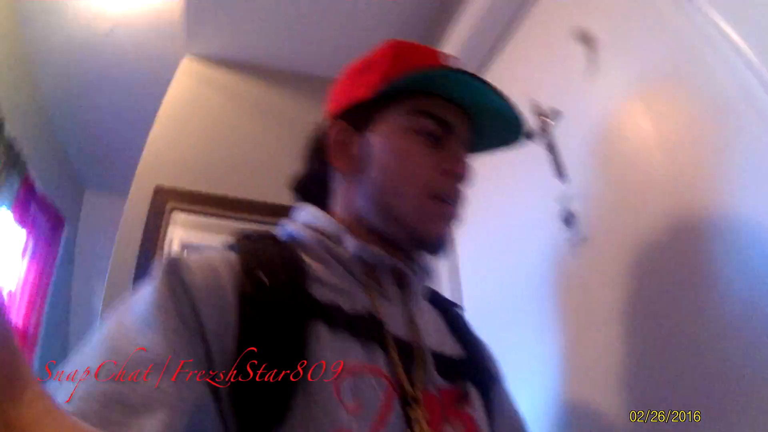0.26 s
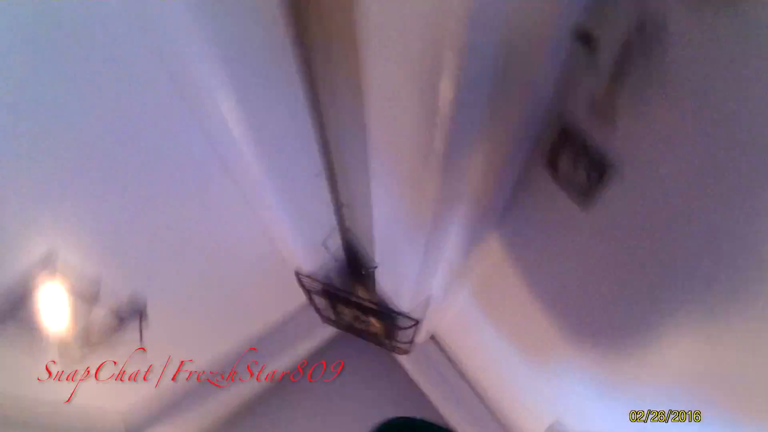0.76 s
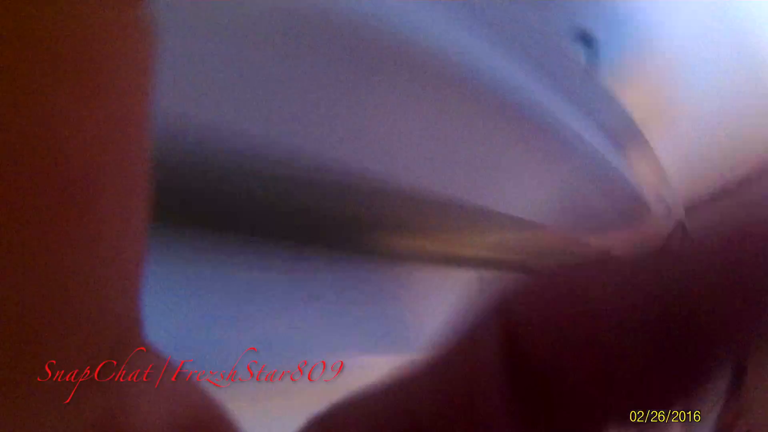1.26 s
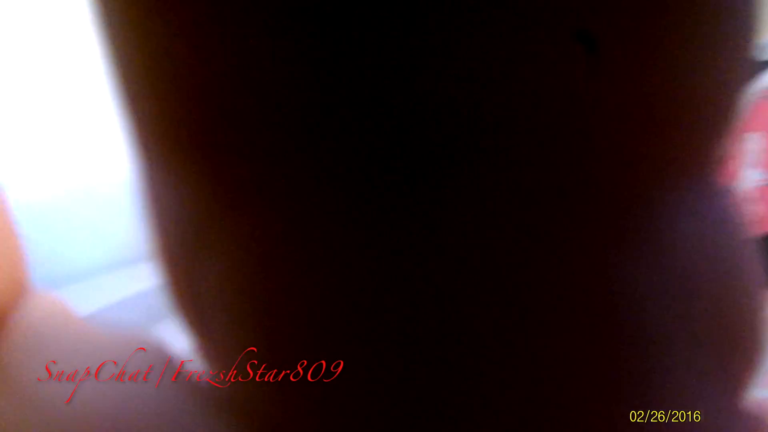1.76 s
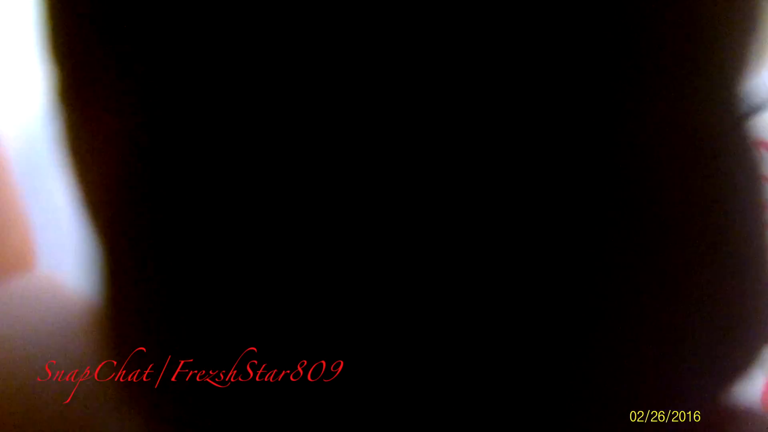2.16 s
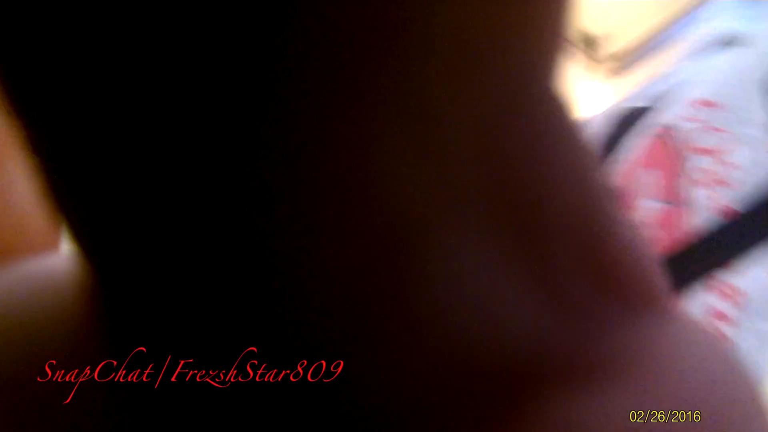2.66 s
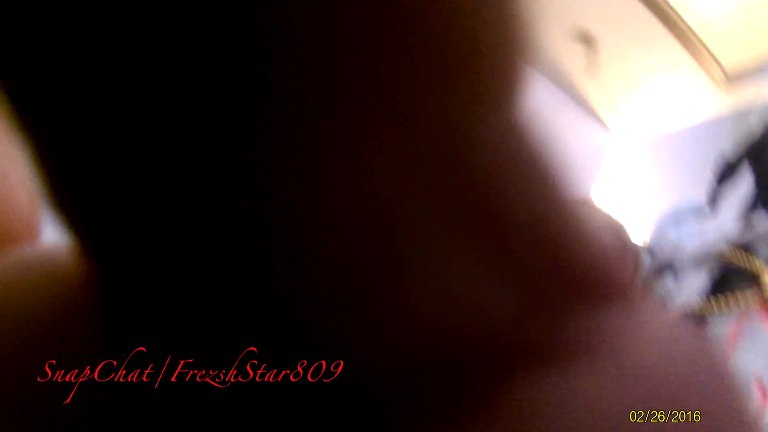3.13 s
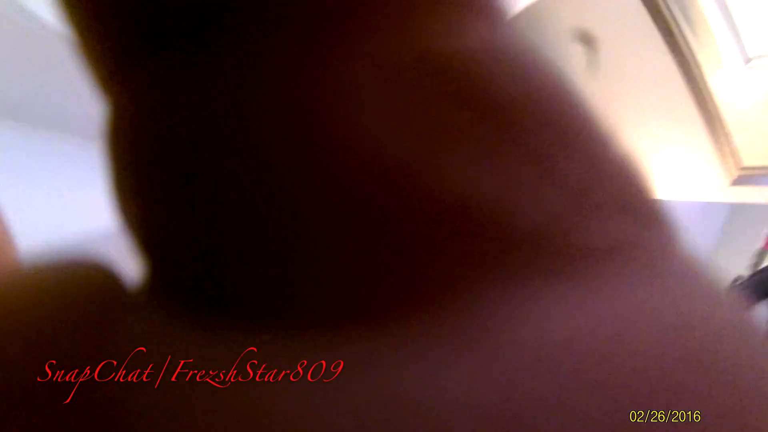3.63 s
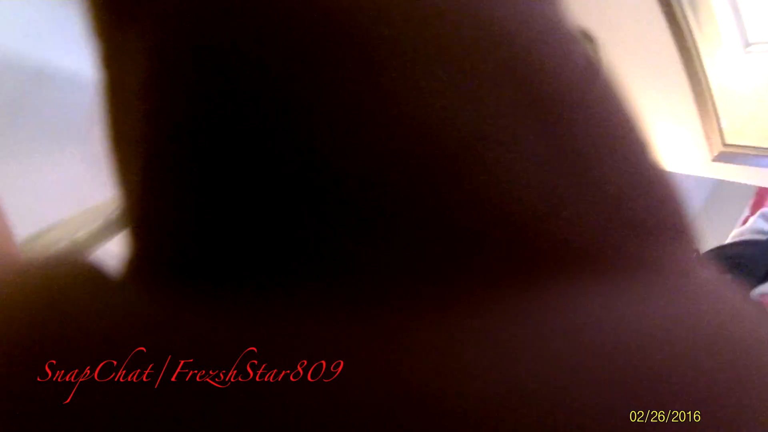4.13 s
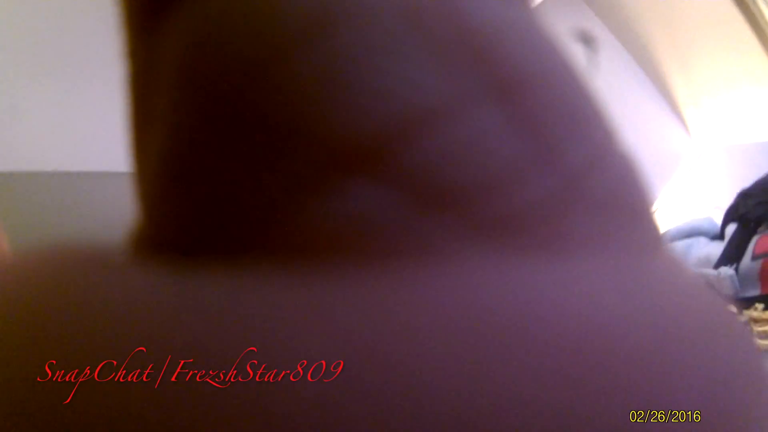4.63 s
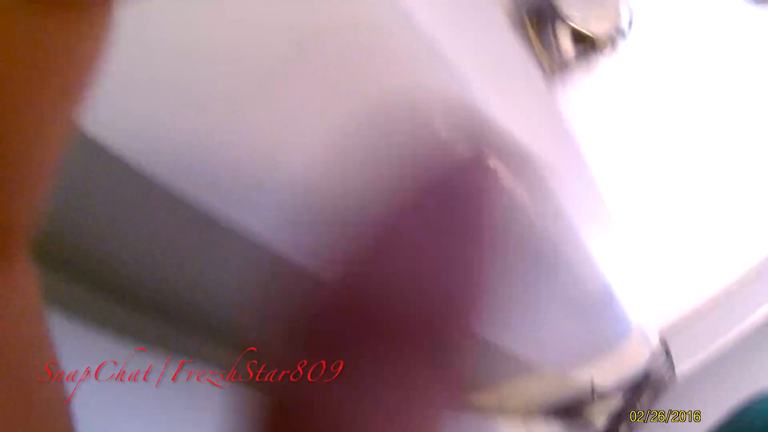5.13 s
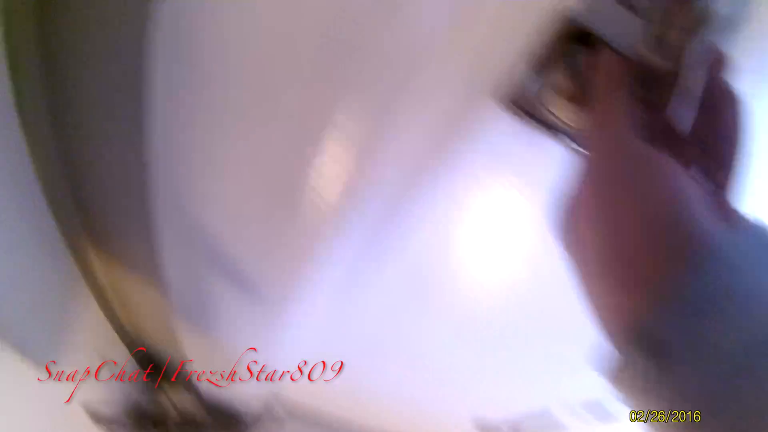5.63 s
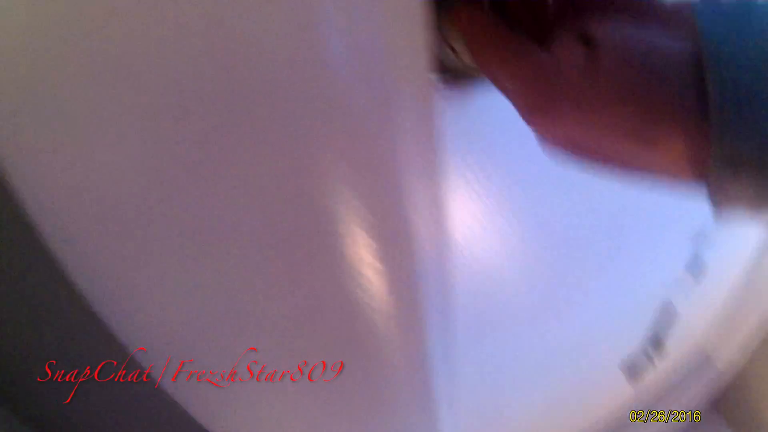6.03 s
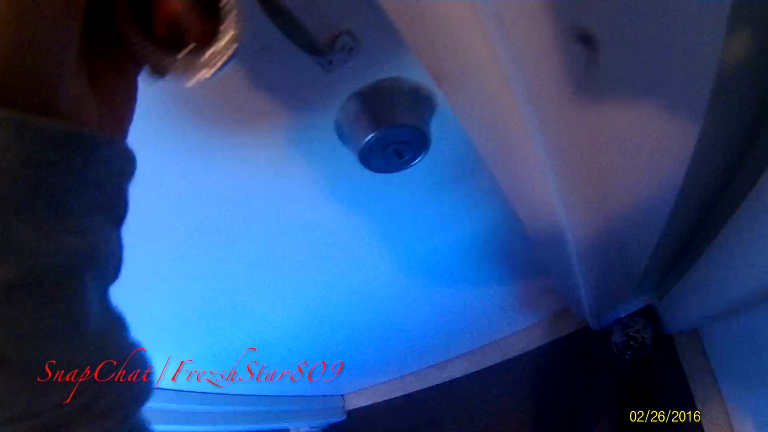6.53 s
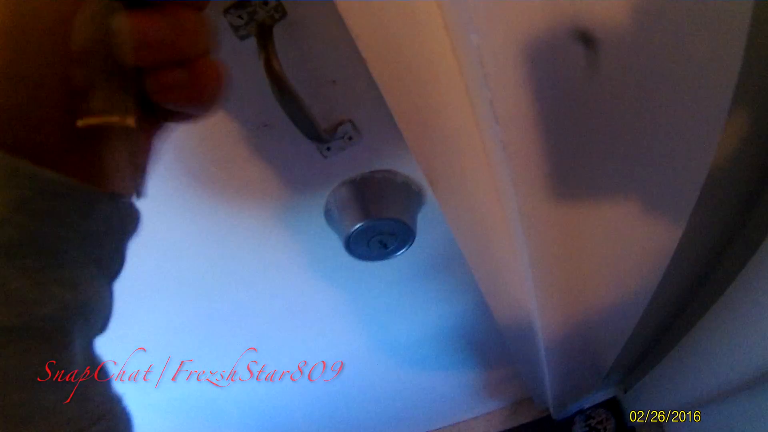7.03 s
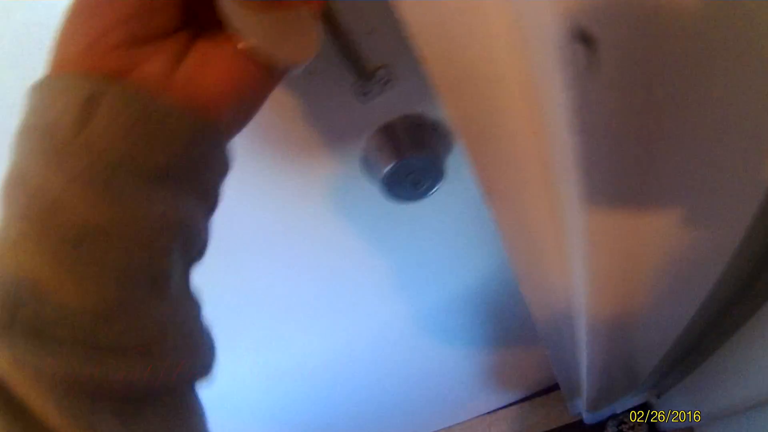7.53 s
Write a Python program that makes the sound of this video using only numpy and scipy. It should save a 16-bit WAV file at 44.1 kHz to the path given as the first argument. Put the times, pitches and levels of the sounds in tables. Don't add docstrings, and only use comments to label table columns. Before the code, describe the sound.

A handheld camera is bumped and scraped while keys jingle; a bolt clanks loudly, a door slams, and a dry snap cuts to silence.

```python
import sys
import numpy as np
from scipy import signal
from scipy.fft import rfft, irfft
from scipy.io import wavfile

SR = 44100
rng = np.random.default_rng(int(sys.argv[2]) if len(sys.argv) > 2 else 0)


def generate_wav(signal):
    frames = np.transpose(np.atleast_2d(signal))
    scaled = np.clip(frames, -1, 1) * 32767
    pcm = np.round(scaled).astype(np.int16)
    wavfile.write(sys.argv[1], SR, pcm)


def voltage_ratio(level):
    return 10 ** (np.asarray(level, float) / 20)


N = 343098
T = np.arange(N) / SR

# t/s, effort/dB, share of keys [0-1], share of dull wood [0-1], palm muffling/dB
MOTION = [(0, -56.5, 0.33, 0, 5), (1.07, -43.5, 0.18, 0.16, 5.5), (1.5, -45, 0, 0.15, 11),
          (1.93, -56, 0.2, 0.2, 7), (2.33, -52, 0.88, 0.01, 7), (2.8, -50, 0.46, 0, 2),
          (3.33, -54.5, 0.66, 0, -1.5), (3.9, -59.5, 1, 0.87, -6), (4.4, -52.5, 0.03, 0.4, 17),
          (4.55, -30.5, 0, 0.98, 18), (4.9, -38, 0, 0.87, 5), (5.15, -39.5, 0.7, 0.4, -2.5),
          (5.5, -40, 0.56, 0.5, 0), (5.68, -47, 1, 0.7, 1.5), (5.95, -35.5, 0.07, 0.14, 17.5),
          (6.34, -38.5, 0, 0.63, 5.5), (6.42, -54.5, 0.8, 0.8, -8), (6.9, -67.5, 0.1, .4, 0.5)]
# f/Hz, level/dB
BUNCH = [(2450, -5), (6200, -5), (7000, -12.5), (10880, 1.5), (11550, -3), (12610, -13), (14200, -3.5),
         (15550, -4.5)]
# f/Hz, width/Hz, level/dB
SHELL = [(883, 583, -3), (1105, 130, 4), (1353, 172, 0), (1784, 475, -3), (2287, 280, -6.5)]
# f/Hz, width/Hz, level/dB
CASE = [(3440, 2500, -2), (3920, 1640, 7.5), (6170, 1900, 1)]
# t/s, level/dB, length/s
SLAM = [
    (6.924, -31, .02),
    (6.936, -18, .013),
    (6.946, 0, .02),
    (6.97, -7, .034),
    (7.005, -27, .045),
]


def rms_one(x):
    return x / np.sqrt(np.mean(x ** 2) + 1e-20)


def in_time(rows):
    s, *columns = np.transpose(rows)
    return [np.interp(T, s, c) for c in columns]


def band(x, low_hz, high_hz):
    sos = signal.butter(2, [low_hz, min(high_hz, .45 * SR)], "band", fs=SR, output="sos")
    return signal.sosfilt(sos, x)


def drift(rate):
    r = np.exp(-80 * np.pi * rate / SR)
    noise = rng.standard_normal(N // 40 + 2002)
    slow = signal.lfilter([1], [1, -2 * r, r * r], noise)[2000:]
    return np.interp(np.arange(N) / 40, np.arange(len(slow)), rms_one(slow))


def body(x, modes):
    out = 0
    for k, (hz, width_hz, db) in enumerate(modes):
        r = np.exp(-np.pi * max(width_hz, 2) / SR)
        gain = (-1) ** k * voltage_ratio(db) * (1 - r * r) / 2
        out = out + signal.lfilter([gain, 0, -gain], [1, -2 * r * np.cos(2 * np.pi * hz / SR), r * r], x)
    return out


def clumped(x, modes, grain):
    return sum((-1) ** k * np.roll(grain, k * N // 7) ** 1.1 * body(x, [mode])
               for k, mode in enumerate(modes))


def place(times, sounds, peaks_db):
    out = np.zeros(N + sounds.shape[1])
    for s, sound, db in zip(times, sounds, peaks_db):
        at = round(s * SR)
        out[at:at + len(sound)] += voltage_ratio(db) * sound / np.max(np.abs(sound))
    return out[:N]


def dying(t60, rise_s, size):
    t = np.arange(size) / SR
    return (1 - np.exp(-t / rise_s)) * voltage_ratio(-60 * t / np.clip(t60, .004, 1)[:, None])


def noise_bursts(t60, rise_s, size):
    return rng.standard_normal((len(t60), size)) * dying(t60, rise_s, size)


def rung(times, db, hz, t60, rise_s):
    t = np.arange(12000) / SR
    return place(times, dying(t60, rise_s, size=len(t)) * np.sin(2 * np.pi * np.outer(hz, t)), db)


def among_keys(bursts, chance, width_hz):
    count = len(BUNCH)
    rows = []
    for row, c in zip(bursts, chance):
        modes = [(min(hz * (1 + .05 * c[k]), 15800), width_hz, db + 4.5 * c[count + k])
                 for k, (hz, db) in enumerate(BUNCH)]
        rows.append(body(row, modes))
    return np.array(rows)


def pitched(rows, t60_s, broad):
    s, db, hz = np.transpose(rows)
    noise = noise_bursts(t60_s + 0 * s, 0.00022, size=1500)
    sounds = [body(row, [(f, f / 11, 0)]) + broad * band(row, f / 2, f * 2) for row, f in zip(noise, hz)]
    return place(s, np.array(sounds), db)


def hiss():
    # f/Hz, level/dB
    colour = [(12, -17.5), (20, 10), (74, 5.5), (542, -6), (1660, -18.5), (5530, -36.5), (7520, -34),
              (10200, -26), (16000, -29)]
    hz = np.maximum(np.fft.rfftfreq(N, 1 / SR), 1)
    colour_hz, colour_db = np.transpose(colour)
    gain = voltage_ratio(np.interp(np.log(hz), np.log(colour_hz), colour_db))
    return voltage_ratio(-49) * rms_one(irfft(rfft(rng.standard_normal(N)) * gain, N))


def handling_rumble():
    lumps = band(signal.lfilter([1], [1, -.985], rng.standard_normal(N)), 25, 510)
    return voltage_ratio(-26 + .53 * in_time(MOTION)[0] + 2.0 * drift(2.8)) * rms_one(lumps)


def circuit_whistle():
    # t/s, level/dB, chopping depth [0-1]
    tone = [
        (0, -61, .3),
        (1.3, -58, .3),
        (4.2, -57, .45),
        (6.4, -57, .95),
        (7.6, -57, .95),
    ]
    whistle_hz, chop_hz, chop_start_s = 10020, 38.3, 6.556
    db, depth = in_time(tone)
    off = (T - chop_start_s) * chop_hz % 1 > .52
    whistle = voltage_ratio(db) * (1 - np.clip(depth, 0, 1) * off) * np.sin(2 * np.pi * whistle_hz * T)
    wobble = voltage_ratio(-55) * (T < .21) * rms_one(band(rng.standard_normal(N), 9200, 9900))
    return whistle + wobble


def groans():
    # t/s, length/s, level/dB, f/Hz
    low_groans = [(0, 0.074, -49.5, 570), (.575, 0.048, -34, 190), (.575, .08, -38.5, 91),
                  (.65, .06, -42, 170), (.7, 0.095, -39.5, 60), (2.38, 0.1, -48.5, 1486),
                  (2.44, 0.061, -47, 1830), (2.76, 0.12, -45, 224), (3.055, 0.035, -43, 1050),
                  (3.15, 0.11, -50, 250), (4.15, 0.27, -49, 179), (4.45, 0.27, -37, 165),
                  (4.52, 0.11, -37, 65.4), (5.06, 0.057, -44, 170), (7.009, .2, -39, 200),
                  (7.32, 0.073, -39, 224)]
    out = np.zeros(N)
    for s, length, db, hz in low_groans:
        noise = rng.standard_normal(round(length * SR) + 4000)
        mode = [(hz, min(hz / 4.5, 40), 0)]
        groan = rms_one(body(body(noise, mode), mode)[4000:])
        at = round(max(s, 0) * SR)
        out[at:at + len(groan)] += voltage_ratio(db) * groan * np.hanning(len(groan)) ** .5
    return out


def stroke_power():
    # t/s, length/s, level/dB
    skin_rubs = [(.396, .13, -42), (.554, 0.075, -32.5), (.718, 0.022, -42), (.756, 0.039, -36),
                 (.866, 0.11, -35), (.99, 0.07, -37.5), (1.134, .13, -33), (1.62, 0.13, -36.5),
                 (3.054, 0.046, -40.5), (5.298, 0.012, -25.5), (5.855, 0.014, -13.5), (6.124, 0.11, -34.5),
                 (6.253, 0.11, -41.5)]
    door_scrapes = [(2.07, 0.07, -46), (4.459, 0.15, -31.5), (4.55, 0.092, -29.5), (5.79, 0.048, -22.5),
                    (6.1, 0.012, -12), (6.645, 0.02, -38.5), (6.729, 0.02, -44.5), (6.772, 0.021, -40.5),
                    (7.146, 0.035, -27.5), (7.18, 0.05, -34), (7.438, 0.014, -30.5), (7.455, 0.02, -32.5)]
    grips = [(.95, 0.08, -30), (3.793, 0.017, -33), (4.113, 0.07, -41.5), (4.186, 0.096, -32),
             (4.28, 0.069, -37.5), (4.754, 0.16, -32), (5.77, 0.021, -24)]
    key_shakes = [(1.768, .05, -37), (3.41, 0.11, -37.5), (3.64, 0.093, -30), (5.791, .021, -19.5),
                  (7.135, 0.11, -39.5)]
    # strokes, shell/dB, rub/dB, bright/dB, place of the top [0-1]
    kinds = [(skin_rubs, -1.8, 2.4, -3, 0.64), (door_scrapes, .1, -3.5, -28.5, 0.54),
             (grips, .1, -34, -26, 0.18), (key_shakes, -18.5, -3.5, .1, 0.14)]
    # t/s, shell/dB, rub/dB, bright/dB, t60/s
    shudder = (7, -22.5, -33, -50, 1)
    s, *db, t60 = shudder
    decay = voltage_ratio(np.array(db)[:, None] - 60 * (T - s) / t60)
    power = (decay * np.clip((T - s) / .04 + 1, 0, 1)) ** 2
    for rows, *colour_db, top in kinds:
        for s, length, db in rows:
            end = s + 1.5 * length
            span = slice(round(s * SR), round(end * SR))
            corners = [s, s + length * np.clip(top, .05, .95), s + length, end]
            swell = np.interp(T[span], corners, [0.24, 1, .2, 0.024])
            power[:, span] += (voltage_ratio(db + np.array(colour_db))[:, None] * swell) ** 2
    return power


def motion():
    # f/Hz, width/Hz, level/dB
    leaf = [(1870, 160, -1.5), (2450, 96, 1), (2790, 120, -4.5), (3600, 75, -3), (5360, 51, -9.5)]
    effort_db, metal, wood, muffle_db = in_time(MOTION)
    metal, wood = np.clip([metal, wood], 0, 1)
    rub_db = effort_db - 0.3 - 0.52 * muffle_db
    bright_db = effort_db + 3.5 * metal - 9 * wood - muffle_db
    shell, rub, bright = np.sqrt(voltage_ratio(np.array([effort_db, rub_db, bright_db])) ** 2 + stroke_power())

    white = rng.standard_normal((3, N))
    calm = np.where(T > SLAM[0][0], 1, wood)
    grain = voltage_ratio((1 - .55 * calm) * 3.37 * drift(30) + 0.8 * drift(200))
    born = rng.random(N) < 800 * voltage_ratio(5.0 * drift(25)) / SR
    clicks = born * voltage_ratio(2.5 * np.minimum(rng.exponential(1, N), 3)) + 1e-18
    held_width_hz = 170
    jangle = sum(body(clicks * rng.standard_normal(N), [(hz, held_width_hz, db)]) for hz, db in BUNCH)
    jangle = rms_one(jangle) + .5 * rms_one(clicks * white[0])

    def with_keys(noise, low_hz, high_hz):
        friction = rms_one(grain * band(noise, low_hz, high_hz))
        return np.sqrt(1 - metal) * friction + np.sqrt(metal) * rms_one(band(jangle, low_hz, high_hz))

    through_shell = clumped(white[0], SHELL, grain) + 0.014 * band(white[0], 340, 3000)
    rumble = shell * rms_one(voltage_ratio(2.2 * drift(54)) * through_shell)
    scrape = band(clumped(white[1], leaf, grain), 1500, 5500) + 0.18 * band(white[1], 1800, 3500)
    skin = np.sqrt(1 - wood) * rms_one(body(white[1], CASE)) + np.sqrt(wood) * rms_one(scrape)
    rustle = body(white[2], [(9600, 4300, 0)])
    return rumble + rub * with_keys(skin, 2500, 7400) + bright * with_keys(rustle, 6900, 15000)


def taps():
    # t/s, air peak/dB, shell peak/dB
    blows = [(.0668, 3.5, -2), (5.828, 4.5, -2.5), (5.8605, -1.5, -6), (5.8688, -3, -3), (6.015, -6, -6),
             (6.085, -10.5, -9.5), (6.105, -12, -7.5)]
    snaps = [(.0555, -31, -24), (.1055, -16, -26), (.1098, -12.5, -15), (.2582, -18.5, -21),
             (.3431, -18.5, -30.5), (.5556, -22, -37), (1.055, -22.5, -25.5), (1.2265, -19, -16.5),
             (1.3843, -23, -30), (1.705, -26, -32), (2.7516, -21, -23.5), (3.142, -23, -27),
             (3.7068, -36, -19), (3.7512, -30, -10), (5.7698, -16, -15), (5.9636, -20.5, -11.5),
             (6.3562, -18.5, -21.5), (6.951, 5.5, -13.5)]
    knocks = [(.7568, -8.5, -13.5), (.8474, -20, -24.5), (1.258, -23.5, -15.5), (2.8554, -25, -38),
              (4.563, -4.5, -9), (4.664, -12.5, -16.5), (4.7885, -20.5, -31), (4.995, -20, -29),
              (5.5702, -26, -30), (6.118, -22, -25), (6.2484, -22, -18), (6.485, -25.5, -29.5),
              (6.8054, -36, -33.5), (6.95, -2.5, -19.5)]
    clinks = [(.7462, -22, -19), (2.3715, -25, -41), (2.579, -31, -26.5), (2.614, -26, -33),
              (2.6713, -28.5, -34), (2.828, -17, -32.5), (3.2735, -29.5, -37), (3.4272, -25.5, -32.5),
              (3.4545, -18.5, -32.5), (3.6467, -20, -25.5), (3.667, -13, -45), (3.699, -26, -45),
              (3.7214, -16.5, -33), (3.7687, -28.5, -24), (3.804, -23, -36), (3.907, -29, -35.5),
              (4.4856, -32.5, -27), (4.9104, -13, -15.5), (4.9607, -34, -23.5), (5.058, -17, -25),
              (5.2043, -30, -28), (5.2709, -23.5, -30), (5.5475, -24.5, -51), (5.6065, -21, -29),
              (5.909, -28.5, -27), (6.2327, -14, -20)]
    rattles = [(.4083, -16.5, -30), (.8196, -16, -28), (4.8587, -24.5, -33), (5.1108, -19.5, -28.5),
               (5.314, -13.5, -10.5), (5.3765, -20, -19.5), (5.4131, -22, -20.5), (5.465, -21.5, -32),
               (5.9956, -24, -30)]
    # taps, bright edge over crack/dB, t60/s
    kinds = [(blows, -7.5, 0.0071), (snaps, -8, 0.012), (knocks, -15.5, 0.053),
             (clinks, 8.8, 0.027), (rattles, 0.34, 0.15)]
    events = sorted((s, air_db, shell_db, air_db + edge_db, t60)
                    for rows, edge_db, t60 in kinds for s, air_db, shell_db in rows)
    s, crack_db, shell_db, bright_db, t60 = np.transpose(events)
    noise = rng.standard_normal((len(s), 5000))
    burst = noise * (dying(t60, 0.0001, size=5000) + 0.76 * dying(t60 / 6, 0.0001, size=5000))
    glint = among_keys(burst, noise[:, ::-1], width_hz=280.0) + 0.16 * burst
    wood = np.clip(np.interp(s, *np.array(MOTION)[:, [0, 3]].T), 0, 1)[:, None] ** 2
    hard = band(glint, 2200, 11100) + 0.67 * body(burst, CASE)
    dull = body(burst, [(2470, 450, 2.9), (3380, 670, 0.78)])
    ring = body(noise * dying(t60, 0.00051, size=5000), SHELL)
    return (place(s, (1 - wood) * hard + wood * dull, crack_db) + place(s, ring, shell_db)
            + place(s, band(glint, 8800, 26000), bright_db))


def thuds():
    # t/s, peak/dB, f/Hz
    dull_knocks = [(0.0657, -3, 330), (0.579, -25, 188), (0.755, -25.5, 108), (2.748, -14.5, 216),
                   (3.083, -27, 170), (3.141, -12, 261), (3.643, -25.5, 99), (3.707, -17, 260),
                   (3.751, -12, 330), (4.471, -26, 193), (4.558, -18.5, 176), (5.39, -23.5, 196),
                   (5.823, -13.5, 169), (5.855, -15, 108), (6.011, -20.5, 116), (6.082, -14, 139),
                   (6.105, -10.5, 344), (6.235, -19, 166)]
    # f/Hz, width/Hz, level/dB
    panel = [(178, 60, 0.5), (485, 80, -2), (700, 200, -4)]
    s, db, hz = np.transpose(dull_knocks)
    t60 = 11.7 / hz
    tail = body(noise_bursts(0.2 + 0 * s, 0.0003, size=12000), panel)
    shell_only = (s < .5) | (abs(s - 3.73) < .05)
    tail_db = np.minimum(db - 8, np.where(shell_only, -42, -21))
    return rung(s, db - 3.5, hz, 0.31 * t60, 0.0011) + place(s, tail, tail_db)


def pings():
    # t/s, peak/dB, f/Hz, t60/s
    struck = [(.0671, 3, 1377, 0.013), (.11, -8, 3900, .008), (1.055, -14, 1210, 0.02),
              (1.2595, -33, 3700, .02), (2.554, -31, 6300, .04), (2.58, -27.5, 6230, 0.045),
              (2.614, -31, 1700, .05), (2.752, -20, 650, 0.1), (3.274, -38, 2340, 0.06),
              (3.668, -25.5, 6300, 0.23), (4.86, -29, 2470, 0.095), (4.86, -34, 6200, 0.071),
              (4.91, -16.5, 3050, 0.056), (4.91, -17, 6430, .02), (5.059, -13, 11620, 0.047),
              (5.063, -20, 2530, .04), (5.204, -24.5, 5140, 0.034), (5.302, -19, 2930, .04),
              (5.315, -13.5, 4900, 0.028), (5.377, -31, 4830, .05), (5.547, -26, 6930, 0.061),
              (5.572, -28.5, 4820, 0.036), (5.87, -0.5, 4340, 0.0083), (5.8696, 1.5, 1350, .018),
              (6.0143, 3, 1076, 0.018), (6.12, -29.5, 1340, .5), (6.085, 1.5, 1374, 0.017),
              (6.085, -10.5, 4230, 0.019), (6.1055, -0.5, 1375, 0.024), (6.118, -16, 4110, .02),
              (6.118, -16, 3030, 0.018), (6.248, -14.5, 2323, 0.049), (7.025, -27, 1556, .2)]
    s, db, hz, t60 = np.transpose(struck)
    rough = noise_bursts(t60, 0.00033, size=6000)
    rattle = np.array([body(row, [(f, max(f / 25, 4 / d), 0)]) for row, f, d in zip(rough, hz, t60)])
    return place(s, rattle, db - 2.5) + rung(s, db - 3.5, hz, 0.91 * t60, 0.00057)


def lock():
    # t/s, peak/dB, f/Hz, t60/s
    bolt = [(0.07, -22.5, 1649, 0.26), (5.858, 5, 4450, 0.025), (3.668, -12, 2494, 0.074),
            (5.3149, -6.5, 1641, 0.3), (5.377, -13.5, 1597, 0.3), (5.419, -15, 1674, 0.14),
            (5.576, -15, 1840, 0.07), (5.7742, -3, 1626, 0.17), (5.911, -8.5, 1659, 0.21),
            (6.234, -11.5, 2300, 0.14)]
    s, db, hz, t60 = np.transpose(bolt)
    rattle = noise_bursts(t60, 0.0012, size=12000)
    clank = np.array([body(row, [(f, max(45, 6 / d), 0)]) for row, f, d in zip(rattle, hz, t60)])
    return place(s, clank, db - 9.0) + rung(s, db - 10.0, hz, 0.73 * t60, 0.00092)


def ticks():
    # t/s, peak/dB
    key_ticks = [(0.2213, -30.5), (0.3301, -31), (0.8696, -23), (2.4145, -21.5), (2.4615, -25),
                 (2.5543, -21.5), (2.7786, -22.5), (2.8105, -20.5), (2.8456, -13.5), (2.8964, -22),
                 (2.9073, -19), (2.964, -21), (3.0819, -29), (3.209, -29.5), (3.414, -23), (3.532, -30.5),
                 (3.8147, -21.5), (3.894, -35), (4.0482, -24.5), (4.0906, -28.5), (4.3212, -33)]
    # t/s, peak/dB
    lock_ticks = [(4.766, -22.5), (5.135, -16.5), (5.26, -24), (5.7359, -21), (5.897, -31), (5.9299, -20),
                  (6.395, -26.5), (6.525, -30), (7.2232, -33)]
    s, db = np.transpose(sorted(key_ticks + lock_ticks))
    tick = noise_bursts(0.024 * np.ones(len(s)), 0.000067, size=2500)
    ring = 1.54 * among_keys(tick, rng.standard_normal((len(s), 2 * len(BUNCH))), width_hz=160.0)
    return place(s, band(ring + 0.33 * tick + 0.38 * body(tick, CASE), 2200, 26000), db)


def glints():
    # t/s, peak/dB, f/Hz
    high_glints = [(0.2944, -36.5, 12600), (0.6015, -21, 15400), (0.7098, -31, 14100),
                   (1.0106, -28.5, 14200), (1.0664, -37, 14300), (2.1091, -36, 11700), (2.5222, -37, 15600),
                   (2.6459, -28, 14100), (2.6814, -22, 15700), (2.7112, -34, 15700), (2.7412, -32, 11000),
                   (2.858, -17, 10900), (2.9517, -34, 10800), (2.9836, -24, 14300), (3.1433, -27.5, 10900),
                   (3.1677, -25, 14800), (3.3722, -30, 10800), (3.3914, -27, 15700), (3.5034, -31, 11000),
                   (4.4764, -34, 12200), (4.5024, -32, 15700), (4.5216, -30, 13300), (4.5401, -30, 11700),
                   (4.5935, -33, 13600), (4.7476, -31.5, 11300), (4.814, -29, 15200), (4.8284, -33, 13500),
                   (5.0854, -21, 11600), (5.1164, -15, 14200), (5.3617, -23.5, 14100), (5.4834, -19, 11300),
                   (6.0372, -35, 10400), (6.246, -7.5, 11340), (6.5331, -29.5, 11400), (6.9704, -23, 11100),
                   (6.9954, -27, 14500), (7.1982, -22, 12000), (7.2225, -24.5, 11000), (7.4091, -37, 11550),
                   (7.4545, -35.5, 11300)]
    return pitched(high_glints, t60_s=.016, broad=.04)


def chimes():
    # t/s, upper mode peak/dB, lower mode peak/dB
    free_keys = [(0.82, -14.5, -22), (0.8697, -45, -26), (2.829, -18, -25.5), (2.858, -30, -37),
                 (3.178, -38, -36.5), (3.2745, -9, -16.5), (3.3777, -32, -46.5), (3.6486, -15.5, -31),
                 (3.699, -21, -42), (3.7234, -37, -34), (5.1594, -40, -43), (5.2713, -17, -32)]
    # t/s, peak/dB
    thin_key = [(0.819, -32), (2.829, -29), (3.5344, -38), (5.2754, -38), (5.7359, -46)]
    # f/Hz, t60/s
    key_modes = [(10870, 0.079), (6960, 0.079), (12610, .12)]
    s, upper_db, lower_db = np.transpose(free_keys)
    out = 0
    for (s, db), (hz, t60) in zip([(s, upper_db), (s, lower_db), np.transpose(thin_key)], key_modes):
        out = out + rung(s, db, hz + 0 * s, 0.87 * t60 + 0 * s, .0003)
        out = out + rung(s, db - 18, hz + 25 + 0 * s, 2.7 * t60 + 0 * s, .0003)
    return out


def contacts():
    # t/s, peak/dB, f/Hz
    dry_contacts = [(0.8834, -27, 4400), (1.6404, -25.5, 1010), (1.9839, -35, 1050), (2.161, -34.5, 1021),
                    (2.3822, -35, 1420), (2.4734, -26.5, 1590), (3.4903, -32.5, 2450), (5.0824, -22, 2600),
                    (5.616, -24, 1450), (6.1254, -22, 1330), (6.6674, -37, 1490), (6.685, -32.5, 1580),
                    (6.6974, -34, 1600)]
    # t/s, peak/dB, f/Hz
    more_contacts = [(3.13, -36, 6500), (3.26, -40, 1900), (3.44, -30, 3500), (3.941, -42, 5000),
                     (4.06, -38, 5000), (4.626, -36, 6500), (4.698, -36, 7000), (4.726, -38, 6500),
                     (5.071, -26, 6500), (6.0925, -10, 1200), (6.932, -32, 5000), (6.938, -30, 11300),
                     (7.142, -34, 6000), (7.258, -27, 4300)]
    return pitched(dry_contacts + more_contacts, t60_s=.018, broad=0.13)


def hinge():
    # t/s, f/Hz, level/dB
    whines = [
        [(1.2, 256, -53), (1.3, 256.4, -61), (1.55, 254.3, -64.5), (1.75, 240, -70), (1.86, 256.6, -67),
         (2.05, 260, -69.5), (2.28, 256.3, -62.5), (2.33, 252, -85)],
        [(6.38, 356, -78), (6.42, 351.7, -60.5), (6.62, 347.4, -72), (6.75, 332, -66), (6.9, 307, -71.5),
         (6.95, 296, -78)],
    ]
    orders_db = [6, 7.4, 0.5, 4.5]
    out = 0
    for rows in whines:
        hz, db = in_time(rows)
        turn = 2 * np.pi * np.cumsum(hz * (1 + 0.0025 * drift(18.5))) / SR
        whine = sum(voltage_ratio(o) * np.sin((k + 1) * turn) for k, o in enumerate(orders_db))
        out = out + voltage_ratio(db + 2.0 * drift(11)) * whine * (T > rows[0][0]) * (T < rows[-1][0])
    return out


def ratchet():
    # first/s, gap/s, slowing/s, peak/dB, loss per tooth/dB
    pins = (1.4035, .0185, .0009, -24, 1.7)
    first, gap, slowing, db, loss_db = pins
    k = np.arange(6)
    teeth = noise_bursts(.019 + 0 * k, 0.0016, size=1500)
    teeth = body(teeth, [(3580, 450, 5), (5400, 1100, -1), (8050, 3700, -4.5)])
    return place(first + gap * k + slowing * k * k, teeth, db - loss_db * k)


def slide():
    # t/s, length/s, from/Hz, to/Hz, width/Hz, level/dB
    key_slide = (3.21, .26, 4400, 5400, 450, -44.5)
    s, length, from_hz, to_hz, width_hz, db = key_slide
    gone = np.clip((T - s) / length, 0, 1)
    low_pass = signal.butter(2, width_hz, fs=SR, output="sos")
    noise = rms_one(signal.sosfilt(low_pass, rng.standard_normal(N)))
    turn = 2 * np.pi * np.cumsum(from_hz + (to_hz - from_hz) * gone ** 2) / SR
    return voltage_ratio(db) * np.sqrt(np.sin(np.pi * gone) + 1e-18) * noise * np.sin(turn)


def slam():
    # f/Hz, width/Hz, level/dB
    door_modes = [(175, 22, -7), (608.4, 34, -1), (803, 64, -1), (1032, 116, 3), (1418, 50, -6.5),
                  (1557, 60, -8)]
    # t/s, level/dB, t60/s
    stairwell = (7.005, -23.5, 1.54)
    contact = 0
    for s, level_db, length in SLAM:
        rise = np.minimum((T - s) / .008, 1) ** 2
        contact = contact + voltage_ratio(level_db) * (T >= s) * (T < s + length) * rise
    white = contact * rng.standard_normal(N) + 1e-18
    out = 8.8 * body(band(white, 81, 3800), door_modes) + 0.35 * band(white, 1300, 5500)
    s, db, t60 = stairwell
    flutter = voltage_ratio(db - 60 * np.maximum(T - s, 0) / t60 + 3 * drift(40)) * (T > s)
    ringing = body(rng.standard_normal(N), [(990, 310, 1.8), (595, 250, -0.81)])
    return out + flutter * rms_one(body(ringing, [(1032, 300, 0)]))


def last_snap():
    # t/s, peak/dB, t60/s
    button = (7.4956, 9, 0.006)
    s, db, t60 = button
    snap = noise_bursts(np.array([t60]), .0001, size=1500)
    return place([s], band(snap, 900, 10000) + body(snap, [(2470, 620, 1), (1356, 550, 3)]), [db])


def scene():
    camera = hiss() + handling_rumble() + circuit_whistle()
    hand = groans() + motion() + taps() + thuds() + pings() + contacts()
    keys = ticks() + glints() + chimes() + ratchet() + slide()
    door = lock() + hinge() + slam()
    return (camera + hand + keys + door + last_snap())[None]


def band_limit(x):
    return signal.sosfilt(signal.butter(12, 17160, fs=SR, output="sos"), x)


def record(dry):
    cutoff_hz, end_s = 15900, 7.567
    x = np.clip(dry, -.98, .98)
    x = signal.sosfilt(signal.cheby2(10, 35, cutoff_hz + 300, fs=SR, output="sos"), x)
    return band_limit(x * (T < end_s))


dry = scene()
out = record(dry)
generate_wav(out)
```